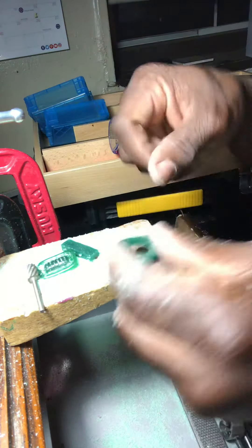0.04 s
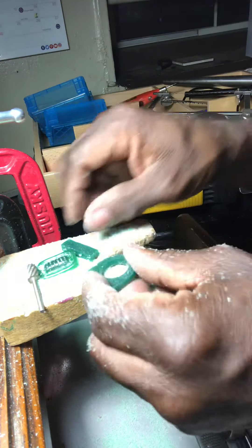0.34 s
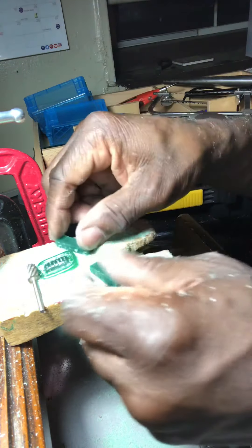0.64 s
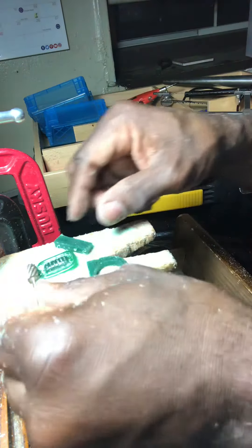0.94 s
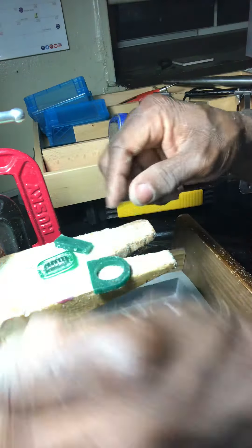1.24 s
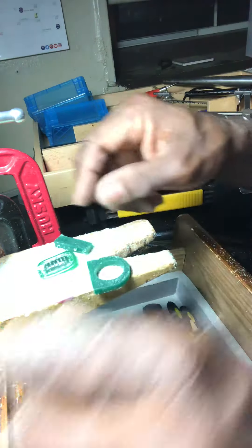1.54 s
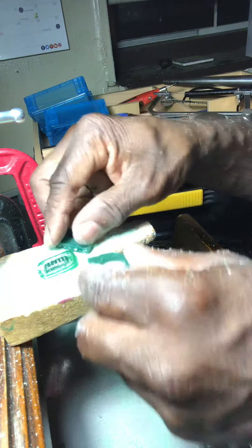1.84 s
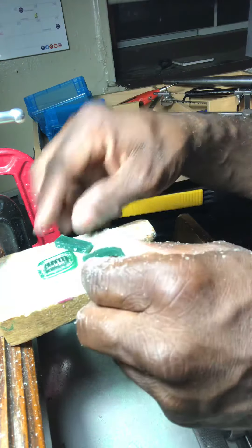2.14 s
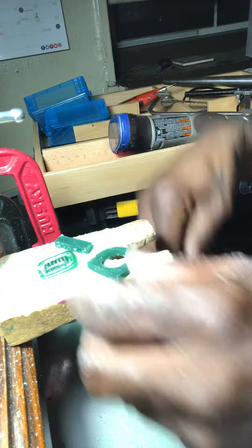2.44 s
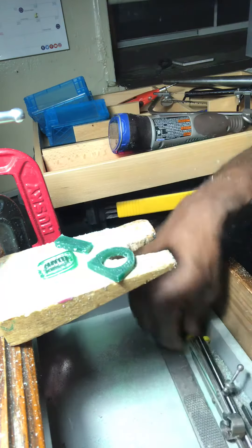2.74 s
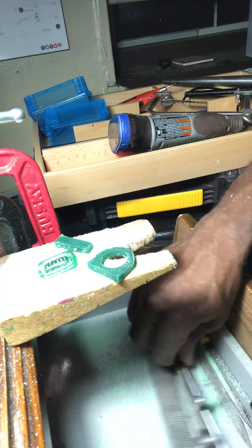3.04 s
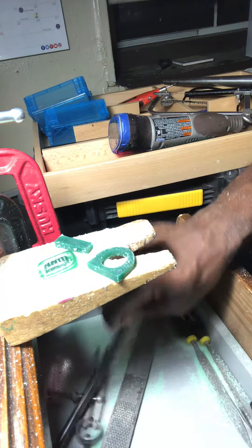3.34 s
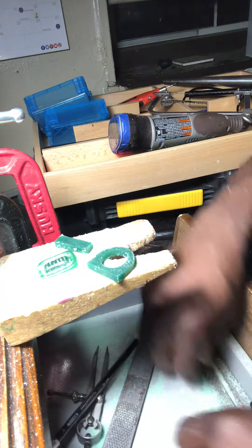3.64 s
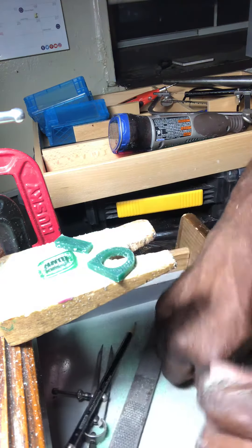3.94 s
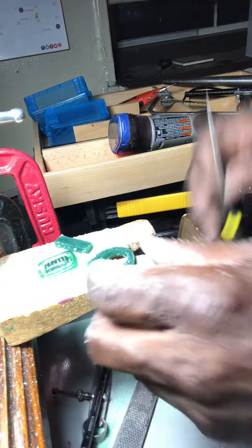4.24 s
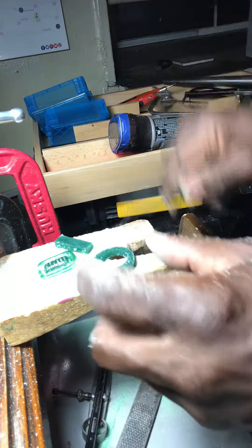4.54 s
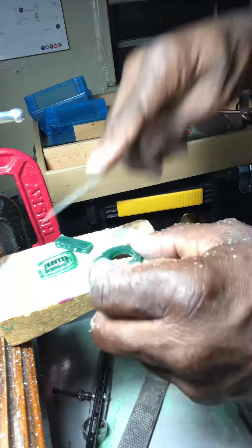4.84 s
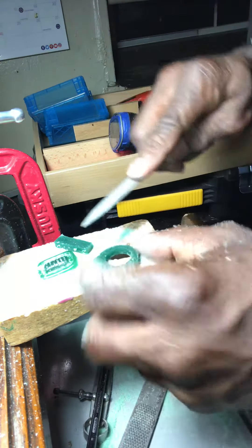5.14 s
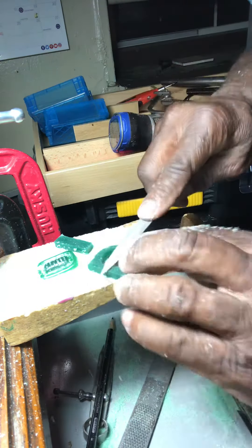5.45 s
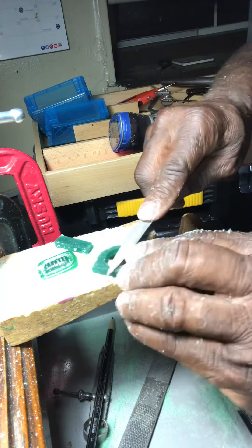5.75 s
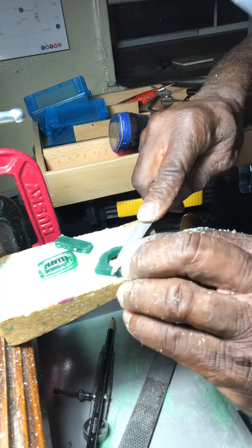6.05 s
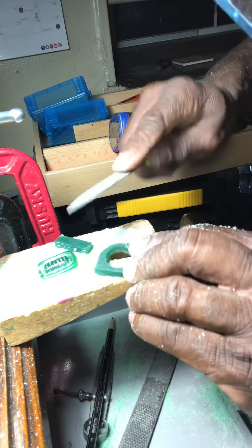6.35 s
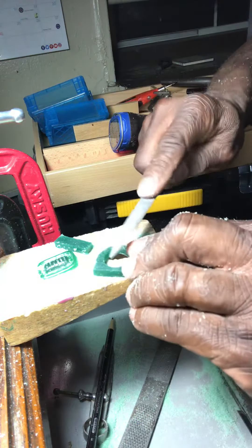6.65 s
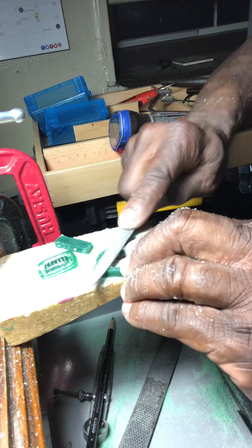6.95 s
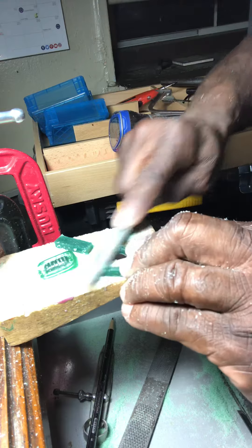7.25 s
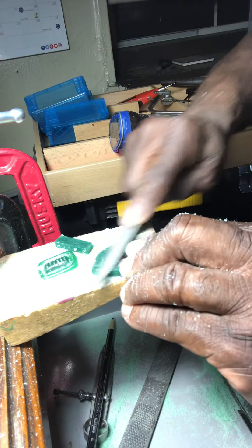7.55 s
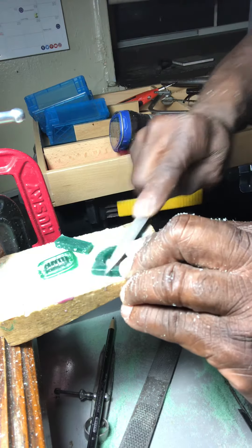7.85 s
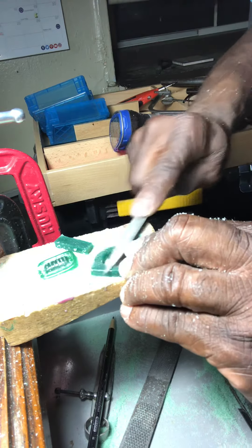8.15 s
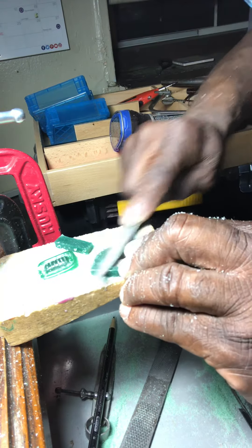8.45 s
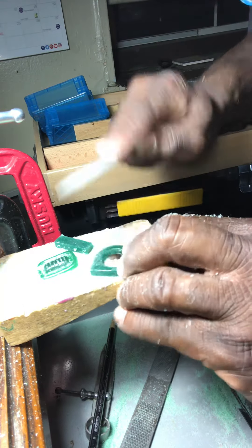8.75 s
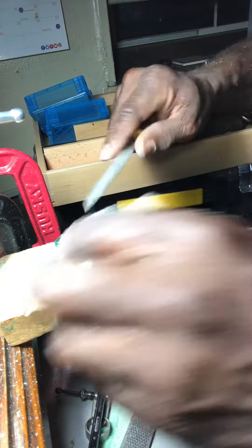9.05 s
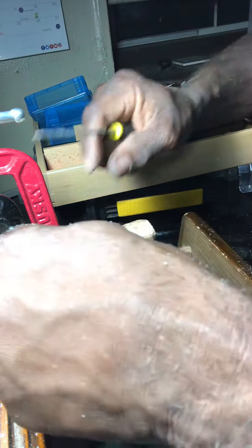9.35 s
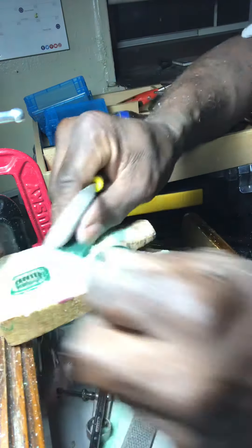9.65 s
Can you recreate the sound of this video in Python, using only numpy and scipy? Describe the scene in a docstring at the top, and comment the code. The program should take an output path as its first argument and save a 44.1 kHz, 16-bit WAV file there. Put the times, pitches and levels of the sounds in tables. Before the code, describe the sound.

A small tool drops on wood, a hand rummages through metal tools, and after a sharp knock quick, faint filing follows.

```python
"""At a jeweller's bench a small steel tool drops on wood and clatters to rest, its shank ringing thinly.
A hand rummages in the catch tray, where steel tools knock, clink and drag. Something is knocked down
and slid on the bench, among faint hollow ticks. Then a needle file works a wax ring against the bench
pin in quick strokes, its teeth rasping brightest at full speed.
A fan runs throughout in the small workshop."""
import sys
import numpy as np
from scipy import signal
from scipy.fft import rfft, irfft
from scipy.io import wavfile
from scipy.ndimage import uniform_filter1d

SR = 44100
rng = np.random.default_rng(int(sys.argv[2]) if len(sys.argv) > 2 else 0)


def file_out(sig):
    """Save sig as 16-bit WAV at sys.argv[1]."""
    # one column per channel
    cols = np.atleast_2d(sig).T
    # limit, then scale
    lim = np.clip(cols, -1, 1)
    pcm = np.round(lim * 32767).astype(np.int16)
    wavfile.write(sys.argv[1], SR, pcm)


N = 436149


def filing(tooth_hz=1300, tooth_db=-12, swell=0.93, fizz_swell=2.2, thrum_db=-10):
    """Steel teeth cut wax. Each stroke speeds up and slows down, biting brightest at full speed."""
    # Tone of teeth cutting wax. Each row: frequency in Hz, gain in dB.
    rasp_tone = [(300, 0.5), (700, 4.5), (1250, 7.5), (2000, -3), (2900, -7), (3250, -1), (3700, -4),
                 (4600, -2), (4950, -12), (5400, 0.5), (7000, -10.5), (9500, -15), (10500, -19),
                 (12500, -12), (15500, -18)]
    # The file bumps the pin. Each row: start in seconds, then level, treble and blade ring in dB.
    taps = [(6.8577, -28.5, 8, -34), (6.8629, -30.5, -29, -13), (7.331, -35, -10, 3), (7.35, -40, -12, -15),
            (8.14, -33.5, -9.5, 4), (8.185, -38, -13.5, 5)]
    # Tone of a bump. Each row: frequency in Hz, gain in dB.
    body = [(100, -14), (480, -7), (770, 2.5), (930, -10), (1300, -9.5), (1800, -16), (2200, -7.5),
            (2800, -25), (4300, -10.5), (5000, -16), (6200, -15.5), (8000, -17), (10400, -33), (12700, -25),
            (16000, -32)]
    # Ring of the file. Each row: frequency in Hz, level in dB, t60 in seconds.
    modes = [(147, -17, 0.16), (228, -12, 0.24), (746, 0, .08), (1216, 3, 0.058), (4240, -6, .2),
             (6580, 5.5, 0.067), (6860, -25, 0.13), (7500, -10, 0.2), (8500, -10, .15), (8900, -2.5, 0.087),
             (9750, -9, 0.15), (10900, -6, 0.18), (11320, -8, 0.1), (14700, -10, .12)]
    t = np.arange(N) / SR
    speed, force, bite = np.zeros((3, N))
    for start, end, db, bite_db in strokes():
        arc = np.sin(np.pi * np.clip((t - start) / (end - start), 0, 1)).clip(0)
        speed += arc
        force += amp(db) * arc ** swell
        bite += amp(db + bite_db) * arc ** fizz_swell
    unsteady = 1 + 0.28 * unit(uniform_filter1d(rng.standard_normal(N), size=100))
    teeth_passed = np.floor(np.cumsum(tooth_hz * speed * unsteady) / SR)
    teeth = np.diff(teeth_passed, prepend=0) * rng.uniform(0, 0.93, N)
    chips = unit(grains(per_s=9000, spread_db=1.5)) + amp(tooth_db) * teeth / np.sqrt(tooth_hz / SR)
    chips = unit(chips * judder(depth_db=2.25))  # the teeth catch unevenly
    blade = unit(signal.oaconvolve(chips, ring(modes))[:N])
    rasp = unit(colour(chips + amp(-20.5) * blade, rasp_tone))
    rub = signal.sosfiltfilt(signal.butter(2, 5000, fs=SR, output="sos"), rasp)
    # The pin shudders under the strokes. Each row: frequency in Hz, gain in dB.
    thrum_tone = [(25, -18), (42, 11), (85, 4.5), (135, 5), (220, 2.0), (400, -15), (1500, -56)]
    thrum = unit(colour(rng.standard_normal(N), thrum_tone))
    out = force * (rub + amp(thrum_db) * thrum) + bite * (rasp - rub)
    out += rub * amp(-14) * skids(taps, fade_db_per_s=227, rise_s=0.0066)  # a scuff after each bump
    for s, db, treble_db, ring_db in taps:
        add(out, s, strike(body, modes, db, treble_db, crack_t60=0.024, ring_db=ring_db))
    return out


def strokes(push_s=0.14, push_bite_db=3, pull_after_s=0.15, pull_s=0.13, pull_db=-1.2, pull_bite_db=-1):
    """A biting push, then a lighter, duller pull: start and end in seconds, force and bite in dB."""
    # The file goes to and fro at a steady pace. Each row: start in seconds, force in dB.
    cycles = [(6.856, -49), (7.121, -43), (7.398, -46.5), (7.659, -47.5), (7.927, -45.5), (8.192, -47),
              (8.456, -48)]
    rows = []
    for push, db in cycles:
        pull = push + pull_after_s
        rows.append((push, push + push_s, db, push_bite_db))
        rows.append((pull, pull + pull_s, db + pull_db, pull_bite_db))
    return rows[:-1]  # end on a push


def tray(skid_db=-9.5):
    """Tools knock on the catch tray and judder across it, both ringing its modes."""
    # Tool hits. Each row: start in seconds, level in dB, hardness from 0 to 1, contact resonance in Hz.
    knocks = [(3.033, -22, 0.12, 1030), (3.249, -25.5, .3, 1400), (3.289, -33, .6, 1290),
              (3.305, -24, 0.7, 1400), (3.3206, -14, .95, 3140), (3.3795, -12, 0.87, 4260),
              (3.407, -22.5, 0.08, 1360), (3.708, -35.5, 0.67, 980), (3.738, -31.5, .0, 910),
              (3.752, -29.5, 0.63, 1640), (3.849, -39, 0.95, 1900), (3.897, -30, 1, 1630),
              (3.943, -31.5, 0.88, 1710), (3.9582, -22, .65, 4000), (3.984, -19.5, .5, 1900),
              (4.012, -39, 1, 1900), (4.1305, -26.5, 0.5, 3180), (4.14, -27.5, 0.4, 890),
              (4.219, -40, 0.32, 1600), (4.261, -30, 0.13, 1297)]
    # Tone of a knock and of a scrape. Each row: frequency in Hz, gain in dB.
    body = [(60, -36), (150, -20.5), (220, -9.5), (360, 1), (550, -10.5), (970, -1.5), (2000, -7.5),
            (3250, -6.5), (4300, -11), (6000, -12.5), (9400, -24), (10700, -30), (13500, -27), (16000, -47)]
    rub_tone = [(30, -44.5), (70, -18.5), (150, -6.5), (205, -3.5), (280, -0.5), (380, -3), (600, -9.5),
                (1250, -8.5), (1600, -16.5), (2600, -21), (3300, -22.5), (4700, -27.5), (6300, -27),
                (10000, -46), (16000, -43)]
    # Ring of the tray. Each row: frequency in Hz, level in dB, t60 in seconds.
    modes = [(194.8, -9.5, 0.093), (268.5, -6.5, 0.37), (383.7, 3.5, .13), (999, 2, 0.17), (1269, -4, 0.13),
             (1490, -6.5, 0.18), (1777, 2.5, 0.11), (2055, -3.5, 0.085), (2370, 2.5, 0.13),
             (2660, 3.5, 0.16), (3315, -10, .1), (3605, -11, 0.084), (4110, -7.5, 0.09), (4700, -11.5, .18),
             (5980, -13, 0.2)]
    slips = unit(grains(per_s=4400, spread_db=3) * judder(depth_db=2.5))
    ringing = unit(signal.oaconvolve(slips, ring(modes))[:N])
    rub = unit(colour(slips + amp(-17) * ringing, rub_tone))
    skid = amp(skid_db) * skids(knocks, fade_db_per_s=279.5, rise_s=0.0074)
    drag = drags()
    out = rub * np.hypot(skid, drag)
    for s, db, hardness, hz in knocks + rattles(drag):
        bass_db, treble_db = touch(hardness, soft=(15.5, -20.5), hard=(-10.5, 4.6))
        add(out, s, strike(body, modes, db, treble_db, bass_db, crack_t60=0.034, ring_db=-11.5,
                           contact_hz=hz, contact_db=9, rise_s=.001))
    return out


def drags(edge_s=.012):
    """Envelope of tools dragged over the tray, most swelling as the hand presses on."""
    # Each row: start and end in seconds, starting level in dB, growth in dB.
    moves = [(2.765, 2.86, -48.5, 9.5), (2.925, 2.985, -40, -4), (3.06, 3.33, -43.5, 22.5),
             (3.74, 4.08, -41, 2), (4.1, 4.21, -42.5, 2)]
    t, gain = np.arange(N) / SR, np.zeros(N)
    for start, end, db, growth_db in moves:
        progress = np.clip((t - start) / (end - start), 0, 1)
        fades = np.clip(np.minimum(t - start, end - t) / edge_s, 0, 1)
        gain += amp(db + growth_db * progress) * fades
    return gain


def rattles(drag, count=36, relative_db=-4.5, spread_db=7, hardness=.6, low_hz=1000, high_hz=3140):
    """A dragged tool trips at random moments, adding small knocks to those on the tray."""
    sliding = np.flatnonzero(drag > 0)
    when, size, place = rng.random((count, 3)).T
    at = sliding[(when * len(sliding)).astype(int)]
    levels_db = 20 * np.log10(drag[at]) + relative_db + spread_db * (size - .5)
    contacts_hz = np.interp(place, (0, 1), (low_hz, high_hz))
    return [(s, db, hardness, hz) for s, db, hz in zip(at / SR, levels_db, contacts_hz)]


def steel_tools():
    """Fingers jostle a slim probe and steel clinks on steel; neighbouring tools soon damp the ring."""
    # The clinks. Each row: start in seconds, level in dB, treble in dB.
    probe_clinks = [(2.765, -53, -5), (2.817, -27.5, 2), (2.933, -38, -9), (2.943, -35.5, -6.5),
                    (2.956, -37.5, -5), (3.007, -36.5, -12), (3.02, -35.5, -6)]
    steel_clinks = [(3.0345, -33.5, 1.5), (3.2912, -39, -1), (3.312, -19.5, 9.5), (3.375, -36, -3.5),
                    (3.4715, -39.5, 2)]
    # Tone of their attacks. Each row: frequency in Hz, gain in dB.
    probe_body = [(180, -48), (300, -10), (2140, -13), (2520, -8), (4910, -12.5), (5520, -7), (9240, -21.5),
                  (10400, -19), (14200, -19), (16000, -27)]
    steel_body = [(1000, -23), (3000, -4), (6500, 3.5), (8500, -9), (11500, -17), (13500, -1), (16000, -11)]
    # Ring of the metal. Each row: frequency in Hz, level in dB, t60 in seconds.
    probe_modes = [(2520, -1, 0.084), (3500, -10, 0.156), (5500, -11, 0.12), (7010, -12, 0.18),
                   (7747, -31, 0.17), (8231, -27, 0.092), (9130, -14, 0.087), (9700, -18, 0.15),
                   (12600, -24, 0.12), (13770, -21, 0.22)]
    steel_modes = [(2540, -8, .15), (3290, -4.5, .1), (6800, -4, .08), (7224, 0, .11), (9333, -1, .12),
                   (9904, -3, .11), (11970, -16.5, .09), (13081, 1, .115), (15730, -11, .06)]
    out = np.zeros(N)
    for s, db, treble_db in probe_clinks:
        add(out, s, strike(probe_body, probe_modes, db, treble_db, crack_t60=0.034, ring_db=-6.5))
    for s, db, treble_db in steel_clinks:
        add(out, s, strike(steel_body, steel_modes, db, treble_db, crack_t60=0.028, ring_db=-2.5))
    return out


def bench():
    """A hard knock on the wooden bench top, a bumpy slide, then a few soft thuds."""
    # Hits on the wood. Each row: start in seconds, then level, bass and treble in dB.
    knocks = [(4.53, -42, 11, 4), (4.5534, -10, -2, 5), (4.729, -42, 4, -6), (4.789, -29.5, 18, -26),
              (4.824, -33.5, 22, -31), (4.884, -37, 8, -14), (5.445, -42.5, 9, -2), (6.758, -45, 18.5, -13),
              (9.405, -44.5, 6, -33)]
    # Shoves that slide something along. Each row: start in seconds, level in dB.
    shoves = [(4.727, -28.5), (4.784, -27.5)]
    # Tone of a knock and of the slide. Each row: frequency in Hz, gain in dB.
    body = [(60, -49.5), (130, -24), (250, -17), (480, 1.5), (1000, 1.5), (1170, -5), (1450, -1.5),
            (1850, -0.5), (2400, -1.5), (2750, -7.5), (3200, -5.5), (4700, -13.5), (5400, -7),
            (7000, -18.5), (10000, -34), (16000, -39.5)]
    rub_tone = [(30, -34), (60, 1), (120, -25), (200, 5), (350, -13), (560, 1), (800, -7), (1450, -3.5),
                (1900, -13.5), (3500, -20.5), (7000, -27.5), (10000, -39), (12000, -36), (16000, -43.5)]
    # Ring after a knock. Each row: frequency in Hz, level in dB, t60 in seconds.
    modes = [(133.4, -8.5, 0.32), (429, -7, 0.12), (538, -4, 0.11), (630, -7, 0.18), (808, -6, 0.13),
             (890, -7, .1), (1486, 11, 0.034), (1570, -5, 0.049), (1963, -0.5, .05), (2420, -5, 0.11),
             (3260, -10.5, 0.072), (3283, -11.5, .08), (3190, 14.5, .09), (3900, 7, 0.064),
             (5170, 4.5, .06), (5800, -18.5, .08), (6220, -13, 0.0754)]
    rub = unit(colour(grains(per_s=5300, spread_db=1.5), rub_tone))
    out = rub * skids(shoves, fade_db_per_s=161, rise_s=0.0067)
    for s, db, bass_db, treble_db in knocks:
        add(out, s, strike(body, modes, db, treble_db, bass_db, crack_t60=.06, ring_db=-8.5))
    return out


def dropped_tool(soft_contact_hz=1290):
    """A small tool bounces on wood: short dry clacks and the thin ring of its steel shank."""
    # The clacks. Each row: start in seconds, level in dB, hardness from 0 to 1.
    bounces = [(1.47, -25, 0.48), (1.485, -24.5, 1.0), (1.4929, -26, 0.99), (1.5298, -29.5, 0.45),
               (1.541, -34, 0.87), (1.5786, -40.5, 1), (1.632, -33.5, 0.6), (1.7519, -35, 0.12),
               (1.842, -44, 0.1), (1.849, -41, 0.78), (1.866, -41.5, 0), (1.932, -41.5, .95)]
    # Bounces that set the shank ringing. Each row: start in seconds, level in dB.
    pings = [(1.47, -49), (1.579, -49), (1.849, -62), (1.933, -72)]
    # Tone of a clack. Each row: frequency in Hz, gain in dB.
    body = [(150, -14.5), (430, -9), (600, 0.5), (1000, -0.5), (1700, 3), (2450, -5), (3000, -5.5),
            (3700, -2.5), (4600, -14), (7000, -28.5), (11000, -37.5), (16000, -39)]
    # Ring of the wood and of the shank. Each row: frequency in Hz, level in dB, t60 in seconds.
    wood_modes = [(248, -9.5, 0.14), (435, -1.5, .12), (927, -1.5, 0.13), (1412, -5, 0.14),
                  (1680, 1, 0.079), (2464, 9.5, 0.022), (2520, -10, 0.038), (3800, -15, 0.046)]
    shank_modes = [(7630, -3, 0.56)]
    out = np.zeros(N)
    for s, db, hardness in bounces + rocking():
        bass_db, treble_db = touch(hardness, soft=(6.6, -35), hard=(-5, 12.2))
        hz = soft_contact_hz * 2 ** hardness  # a harder contact is shorter and rings higher
        add(out, s, strike(body, wood_modes, db, treble_db, bass_db, crack_t60=0.018, ring_db=-4.5,
                           contact_hz=hz, contact_db=4.5))
    for s, db in pings:
        add(out, s, amp(db) * ring(shank_modes))
    return out


def rocking(start_s=1.567, end_s=1.745, gap_s=.0205, level_db=-38.5, hardness=0.11):
    """Between bounces the tool rocks from side to side in soft, quick, nearly even taps."""
    times = np.arange(start_s, end_s, gap_s)
    scatter = rng.standard_normal((len(times), 3)) * (.003, 1.1, 0.15)  # seconds, dB, hardness
    return [(s + late, level_db + louder, hardness + harder)
            for s, (late, louder, harder) in zip(times, scatter)]


def ticks(level_db=-45.5):
    """Soft hollow ticks, a little way off."""
    # Each entry: the start of a tick in seconds.
    starts = [3.513, 3.537, 3.624, 4.89, 4.958, 5.0048, 5.3533, 5.536, 5.7829, 5.9461, 6.398, 6.5697, 6.699]
    # Tone of a tick. Each row: frequency in Hz, gain in dB.
    body = [(400, -10), (1000, -5), (1400, -4), (1800, -10), (2500, -16.5), (4000, -15.5), (8000, -43),
            (16000, -34)]
    # Its hollow ring. Each row: frequency in Hz, level in dB, t60 in seconds.
    modes = [(1225, -17, 0.048), (1399, 1, 0.063), (2500, -15, 0.061)]
    out = np.zeros(N)
    for s in starts:
        add(out, s, strike(body, modes, level_db, crack_t60=0.087, ring_db=3.5))
    return out


def fan(level_db=-49.5, waver_db=-0.27):
    """Steady air noise with a few resonances, wavering slightly."""
    # Tone of the moving air. Each row: frequency in Hz, gain in dB.
    air_tone = [(22, -43.5), (32, -15.5), (42, -5.5), (62, -2), (88, -13), (131, -7.5), (260, -9.5),
                (345, -9), (440, -12.5), (650, -10), (1400, -15), (2600, -23), (7000, -36), (16000, -47)]
    # Resonances and one treble dip. Each row: centre in Hz, width in Hz, gain in dB.
    peaks = [(57.5, 7.5, 7), (131.2, 20, 6), (347.5, 26, 10), (398, 90, 6.5), (2210, 300, 3.5),
             (5665, 440, 2.5), (10330, 850, -7)]
    hz = np.fft.rfftfreq(N, 1 / SR)
    peaks_db = sum(db / (1 + (2 * (hz - centre) / width) ** 2) for centre, width, db in peaks)
    drift = wander(6000, 3000)
    air = irfft(rfft(rng.standard_normal(N)) * amp(read(air_tone, hz) + peaks_db), N)
    return amp(level_db + waver_db * drift) * unit(air)


def room(x, delay_s=.007, echoes_per_s=4000):
    """Short tail of a small cluttered room, each band dying at its own speed."""
    # Reverb time. Each row: frequency in Hz, t60 in seconds.
    decay = [(100, 0.32), (500, 0.18), (3000, 0.23), (7000, 0.19), (15000, 0.23)]
    echoes = rng.choice([-1., 1.], SR // 2) * (rng.random(SR // 2) < echoes_per_s / SR)
    hz, t, bands = signal.stft(echoes, SR, nperseg=256)
    tail = signal.istft(bands * amp(-60 * t / read(decay, hz)[:, None]), SR, nperseg=256)[1]
    tail = np.pad(tail / np.linalg.norm(tail), (round(delay_s * SR), 0))
    wet = signal.oaconvolve(x, tail)[:N]
    return colour(wet, [(3000, -1.0), (7000, -2.5), (14000, -3.5)])  # clutter soaks up the treble


def strike(body, modes, level_db, treble_db=0, bass_db=0, *, crack_t60, ring_db,
           contact_hz=None, contact_db=6, rise_s=0.00023):
    """One blow: a crack of dense, fast-dying modes plus the clear ones, tilted in bass and treble."""
    t, attack = np.arange(SR // 3) / SR, SR // 100
    burst = rng.choice([-1., 1.], len(t)) * amp(-60 * t / crack_t60) * (1 - np.exp(-t / rise_s))
    blow = unit(colour(burst, body), attack) + amp(ring_db) * unit(ring(modes), attack)
    if contact_hz:  # each point of contact favours its own band
        blow = colour(blow, [(contact_hz / 1.37, 0), (contact_hz, contact_db), (contact_hz * 1.42, 0)])
    tilt = [(400, bass_db), (900, 0), (3000, 0), (5500, treble_db)]
    return amp(level_db) * unit(colour(blow, tilt), attack)


def ring(modes, spread_db=2):
    """Free ringing of an object's modes; the place of the blow sets their signs and shares at random."""
    t = np.arange(SR // 3) / SR
    shares = rng.choice([-1, 1], len(modes)) * amp(spread_db * rng.standard_normal(len(modes)))
    return sum(share * amp(db - 60 * t / t60) * np.sin(2 * np.pi * hz * t)
               for share, (hz, db, t60) in zip(shares, modes))


def touch(hardness, soft, hard):
    """Blends two pairs of bass and treble in dB: soft blows thud, hard ones click."""
    return np.add(soft, hardness * np.subtract(hard, soft))


def skids(blows, fade_db_per_s, rise_s):
    """Envelope of the slide that follows each blow until friction stops it."""
    t, power = np.arange(SR // 2) / SR, np.zeros(N)
    for s, db, *_ in blows:
        add(power, s, (amp(db - fade_db_per_s * t) * np.minimum(t / rise_s, 1)) ** 2)
    return np.sqrt(power)


def grains(per_s, spread_db):
    """The grit of friction: random slips of uneven size."""
    size = amp(spread_db * np.minimum(rng.exponential(1, N), 4))
    return size * rng.choice([-1, 1], N) * (rng.random(N) < per_s / SR)


def judder(depth_db):
    """Uneven grip of a sliding object, as a fluttering gain."""
    return amp(depth_db * wander(300, 200))


def wander(first, second):
    """Random drift: noise smoothed twice, over these lengths in samples."""
    return unit(uniform_filter1d(uniform_filter1d(rng.standard_normal(N), first), second))


def colour(x, spectrum, size=2048):
    """Minimum-phase EQ with the given curve, so that attacks stay sharp."""
    hz = abs(np.fft.fftfreq(size, 1 / SR))
    log_gain = np.log(amp(np.maximum(read(spectrum, hz), -100)))
    taps = np.fft.ifft(np.exp(np.conj(signal.hilbert(log_gain)))).real
    return signal.oaconvolve(x, taps)[:len(x)]


def amp(db):
    """Decibels to gain."""
    return 10 ** (np.asarray(db) / 20)


def unit(x, size=None):
    """Scales to rms 1, judged on the first size samples."""
    return x / np.sqrt(np.mean(x[:size] ** 2) + 1e-20)


def read(points, hz):
    """Reads a curve on a log-frequency axis."""
    f, value = np.transpose(points)
    return np.interp(np.log(hz + 1), np.log(f + 1), value)


def add(mix, s, sound):
    """Mixes a sound in at s seconds."""
    part = mix[round(s * SR):][:len(sound)]
    part += sound[:len(part)]


def scene():
    """All the work at the bench, each part with its own reverb send, over the fan."""
    pin = filing()
    rummage = tray() + steel_tools()
    bench_top = bench() + dropped_tool()
    far = ticks()
    wet = room(amp(-8.5) * pin + amp(-10.5) * rummage + amp(-7.0) * bench_top + amp(-13.5) * far)
    return (pin + rummage + bench_top + far + wet + fan())[None]


def record(dry, edge_hz=15950):
    """Clips any peak over full scale, then cuts the very top of the treble."""
    lowpass = signal.firwin(401, edge_hz, window=("kaiser", 9), fs=SR)
    return signal.oaconvolve(np.clip(dry, -1, 1), lowpass[None], "same")


dry = scene()
out = record(dry)
file_out(out)
```